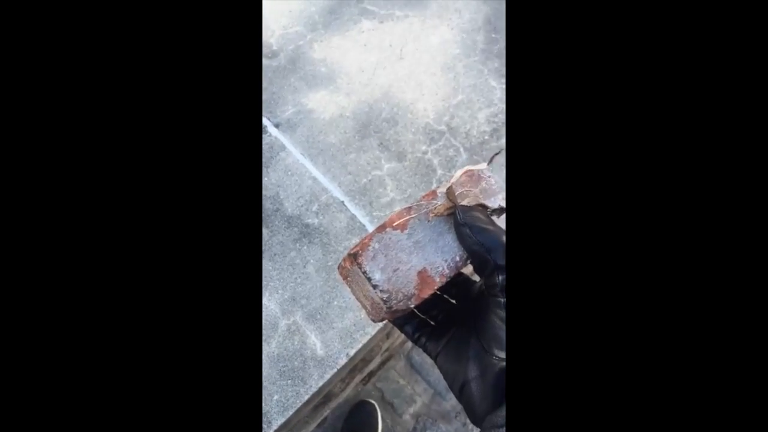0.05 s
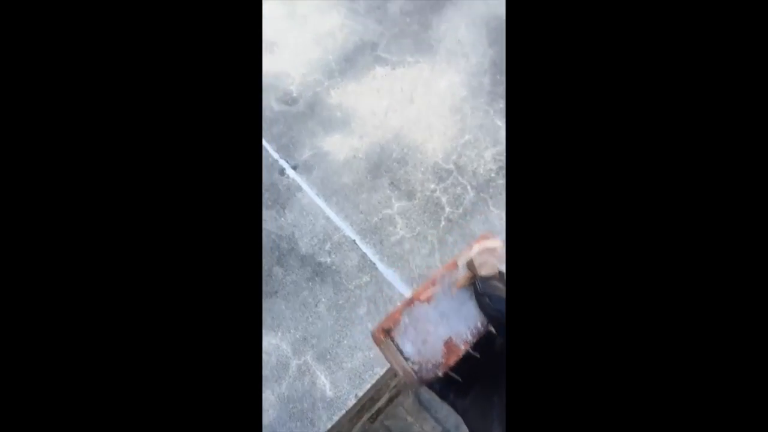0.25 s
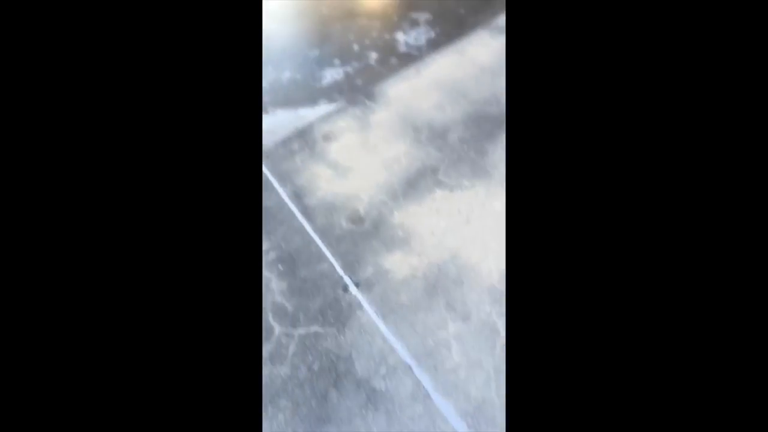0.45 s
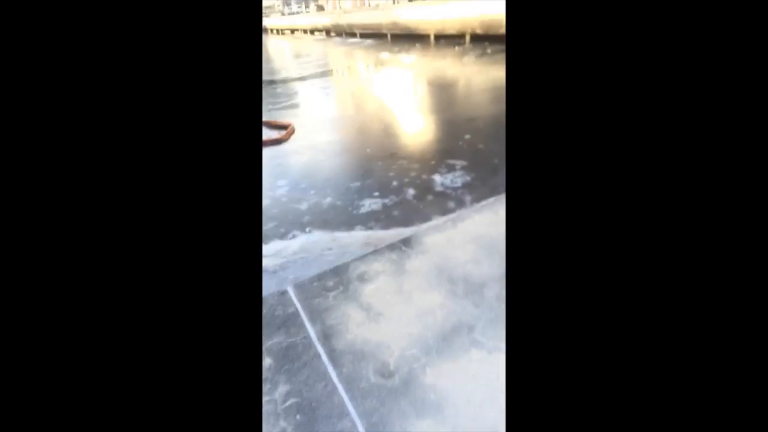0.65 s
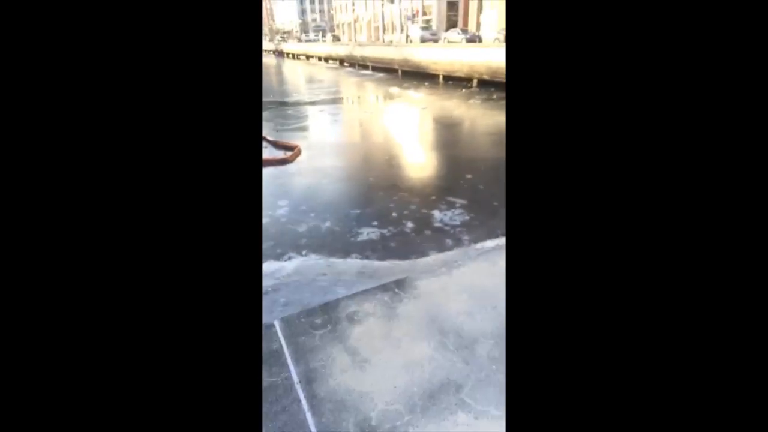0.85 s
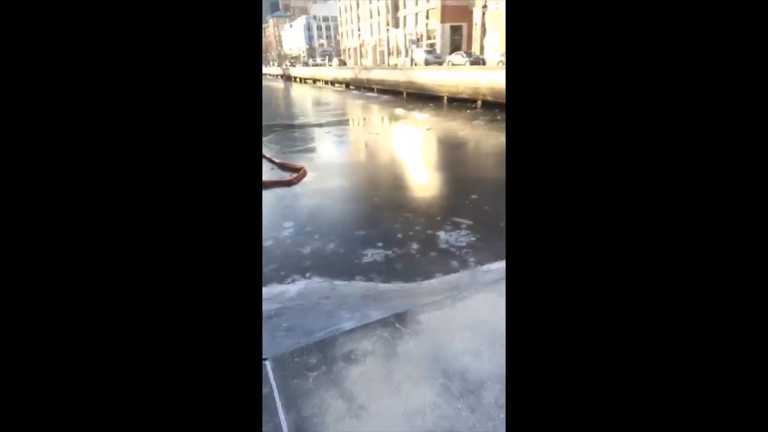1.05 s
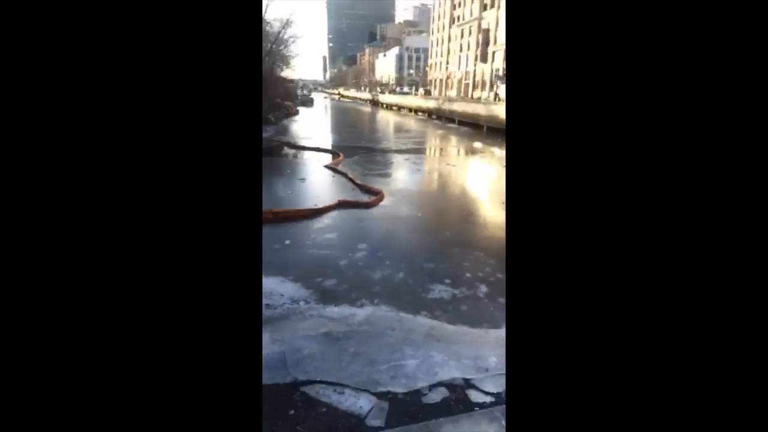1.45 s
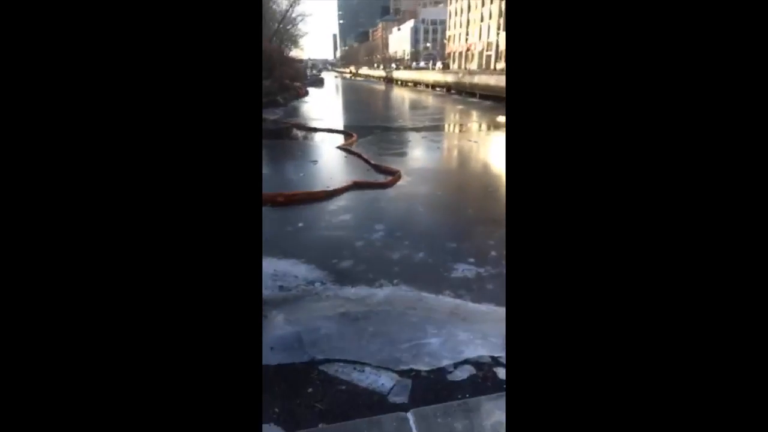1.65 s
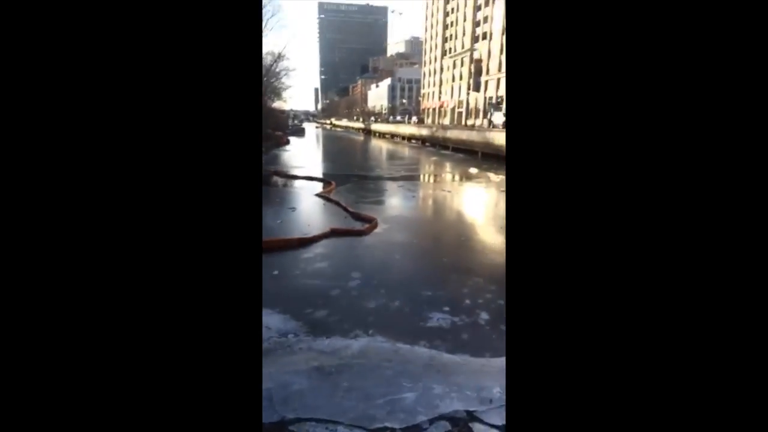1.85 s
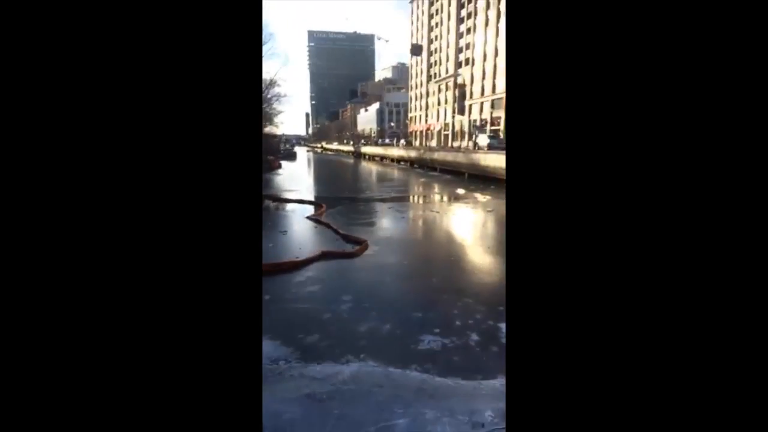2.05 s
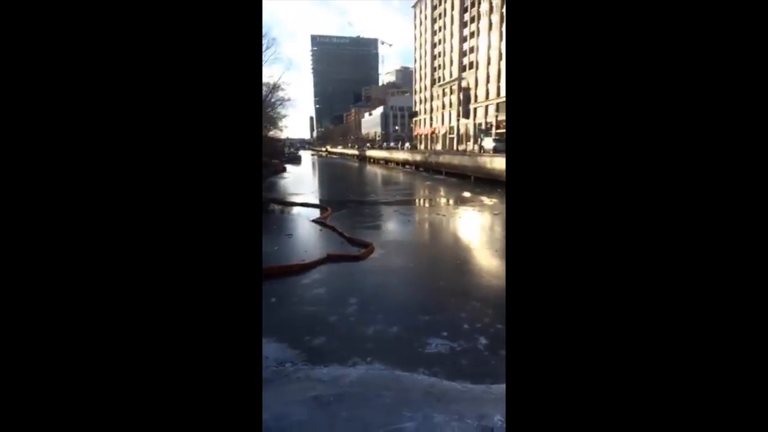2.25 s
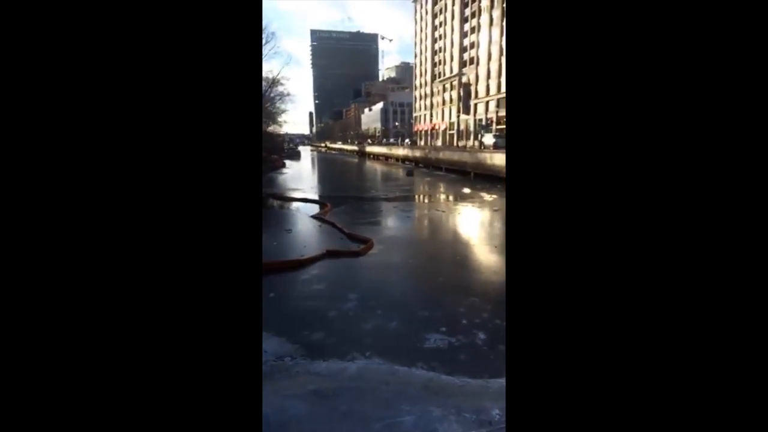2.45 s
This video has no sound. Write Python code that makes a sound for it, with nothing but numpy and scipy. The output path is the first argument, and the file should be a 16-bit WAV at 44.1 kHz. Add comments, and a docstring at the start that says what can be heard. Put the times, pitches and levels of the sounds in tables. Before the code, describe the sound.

Wind rumbles and pops on the microphone as ice briefly cracks on a frozen canal.

```python
"""Gusty wind buffets a phone microphone beside a frozen canal, over a faint town hum.
Turbulent pressure at the microphone port rumbles, flutters and pops. Midway the ice crunches,
a swarm of tiny fractures, and one larger crack excites its damped modes. The crunch trails off
in a fine crackle and a few loose chips click."""
import sys
import numpy as np
from scipy import signal
from scipy.fft import rfft, irfft
from scipy.io import wavfile
from scipy.ndimage import uniform_filter1d

SR = 44100
rng = np.random.default_rng(int(sys.argv[2]) if len(sys.argv) > 2 else 0)


def inscribe(sig):
    """Save sig as 16-bit PCM at rate SR to the path in sys.argv[1].

    A 1-D sig is mono; a 2-D sig holds one channel per row.
    Samples are clipped to [-1, 1] before scaling.
    """
    pcm = np.round(np.clip(np.atleast_2d(sig).T, -1, 1) * 32767)
    wavfile.write(sys.argv[1], SR, pcm.astype(np.int16))


N = 110250
T = np.arange(N) / SR


def undb(db):
    """Amplitude ratio of a level: tenfold per 20 dB."""
    return 10 ** (np.asarray(db) / 20)


def unit(x):
    """Normalisation to rms 1."""
    return x / np.sqrt(np.mean(x ** 2))


def curve(rows):
    """Envelope whose level is linear between points (t/s, level/dB)."""
    return undb(np.interp(T, *np.array(rows).T))


def spectral_gain(spectrum, size):
    """Magnitude response through points (f/Hz, level/dB), interpolated in log frequency."""
    hz, db = np.array(spectrum).T
    f = np.maximum(np.fft.rfftfreq(size, 1 / SR), 1)
    return undb(np.interp(np.log(f), np.log(hz), db))


def colour(x, spectrum):
    """Zero-phase filtering by a spectrum, normalised to rms 1."""
    return unit(irfft(rfft(x) * spectral_gain(spectrum, N), N))


def noise(spectrum):
    """Filtered white noise takes on the spectrum of the filter."""
    return colour(rng.standard_normal(N), spectrum)


def swells(rows, shape):
    """Incoherent addition: rounded swells (t/s, duration/s, level/dB) sum in power."""
    powers = (undb(db) ** 2 * np.exp(-np.abs(2 * (T - centre) / length) ** shape)
              for centre, length, db in rows)
    return np.sqrt(sum(powers))


def decay(start, t60):
    """Exponential damping: after a sudden onset the level falls 60 dB in t60 seconds."""
    return (T >= start) * np.exp(-np.log(1000) * np.clip((T - start) / t60, 0, 10))


def clacks(rows, spectrum, size=1024):
    """Impulses (t/s, level/dB) excite a minimum-phase response, whose energy arrives early."""
    cepstrum = irfft(np.log(spectral_gain(spectrum, size)))
    response = irfft(np.exp(rfft(2 * cepstrum[:size // 2], size)))
    pulses = np.zeros(N)
    for start, peak_db in rows:
        pulses[int(start * SR)] += undb(peak_db)
    return signal.fftconvolve(pulses, response / np.abs(response).max())[:N]


# traffic hum: spectrum (f/Hz, level/dB) and envelope (t/s, level/dB)
TOWN_SPECTRUM = [(30, -13.5), (100, 10.5), (400, 3), (800, 2), (1300, -2), (2000, -6.5), (2700, -13),
                 (3600, -21.5), (5000, -26), (9000, -30.5), (15000, -39)]
TOWN_ENVELOPE = [(0, -52), (.35, -50), (.8, -51.5), (1.0, -49.5), (1.25, -47.5), (1.6, -45.5), (1.9, -47),
                 (2.1, -48.5), (2.3, -48), (2.5, -49.5)]
def town():
    """Distant traffic adds incoherently into a smooth wash that slowly swells."""
    return noise(TOWN_SPECTRUM) * curve(TOWN_ENVELOPE)


# high hiss: spectrum (f/Hz, level/dB) and envelope (t/s, level/dB)
HISS_SPECTRUM = [(1500, -21.5), (4000, -2.5), (8000, -1.5), (12000, -4), (15500, -10)]
HISS_ENVELOPE = [(0, -87), (.2, -76.5), (.33, -70), (.5, -79), (.85, -84.5), (1.05, -73.5), (1.3, -70),
                 (1.72, -70), (1.9, -70.5), (2.12, -69.5), (2.2, -66.5), (2.27, -78), (2.5, -90)]
def hiss():
    """Slow amplitude modulation makes faint treble noise come and go."""
    return noise(HISS_SPECTRUM) * curve(HISS_ENVELOPE)


# soft rustle: spectrum (f/Hz, level/dB) and swells (centre t/s, duration/s, level/dB)
RUSTLE_SPECTRUM = [(1000, -24), (1600, -2), (2000, 3), (2300, -9), (2800, -7.5), (3500, -18), (6000, -35)]
RUSTLE_SWELLS = [(1.26, 0.18, -57), (2.1, 0.15, -54.5)]
def rustle():
    """Band-limited noise in the upper middle range swells twice."""
    return noise(RUSTLE_SPECTRUM) * swells(RUSTLE_SWELLS, shape=1.9)


# thin ticks: spectrum (f/Hz, level/dB) and onsets (t/s, level/dB)
TICK_SPECTRUM = [(1000, -25), (4000, -18), (6500, 11.5), (9000, 7), (12000, 6.5), (15500, 1)]
TICK_ONSETS = [(.797, -65), (1.190, -59), (1.199, -47), (1.210, -57), (1.506, -47), (1.523, -46),
               (1.543, -47), (1.569, -56), (1.593, -48), (1.607, -47), (1.611, -45.5), (1.624, -45),
               (1.765, -57), (2.153, -56), (2.297, -50)]
def ticks(t60_s=0.013):
    """Rapidly damped bursts of treble noise are heard as a fine, dry crackle."""
    return noise(TICK_SPECTRUM) * sum(undb(db) * decay(start, t60_s) for start, db in TICK_ONSETS)


# loose chips: spectrum (f/Hz, level/dB) and impacts (t/s, peak level/dB)
CHIP_SPECTRUM = [(300, -5), (900, 7), (1500, 3.5), (2100, 6.5), (2600, -13.5), (3300, -17), (5000, -28),
                 (9000, -22), (15000, -31)]
CHIP_IMPACTS = [(1.5802, -24), (1.6985, -23.5), (1.7128, -27), (1.8155, -35)]
def chips():
    """Impact excitation: each chip of ice clicks with a short impulse response."""
    return clacks(CHIP_IMPACTS, CHIP_SPECTRUM)


# modes of the ice (f/Hz, relative level/dB, t60/s)
ICE_RESONANCES = [(990, -15, .008), (2163, 30, 0.023), (2670, -3, 0.027), (6630, -12, .01)]
def ice_ring(start, rise_s=0.00049):
    """Modal superposition: after a fracture the ice vibrates as a sum of damped sinusoids."""
    age = T - start
    modes = sum(undb(db) * decay(start, t60) * np.sin(2 * np.pi * hz * age)
                for hz, db, t60 in ICE_RESONANCES)
    return np.clip(age / rise_s, 0, 1) * modes


# crunching ice: spectrum (f/Hz, level/dB) and bursts (centre t/s, duration/s, level/dB)
CRUNCH_SPECTRUM = [(300, 10.5), (1000, 7.5), (1600, 10), (2200, 11.5), (2750, 13.5), (3400, -2.5),
                   (4800, 2), (6500, 5.5), (8500, 3), (10500, -0.5), (12500, 4.5), (15500, -2.5)]
CRUNCH_BURSTS = [(1.394, 0.033, -49), (1.4145, 0.0089, -37.5), (1.423, 0.0079, -39.5),
                 (1.4295, 0.0023, -37), (1.435, 0.0058, -35), (1.455, 0.0074, -33), (1.461, 0.025, -46),
                 (1.467, 0.0056, -31.5), (1.52, 0.089, -52.5), (1.526, .008, -59), (1.607, 0.018, -52),
                 (1.676, 0.029, -57)]
def crunch(fractures_per_s=4600, spread_db=1.5, clump_s=0.0024, clump_db=1, ring_db=-16):
    """Shot noise: tiny fractures of uneven size come in bursts and faintly ring the ice."""
    fractures = (rng.random(N) < fractures_per_s / SR) * rng.choice([-1, 1], N)
    sizes = undb(spread_db * np.minimum(rng.exponential(size=N), 5))
    clumps = undb(clump_db * unit(uniform_filter1d(rng.standard_normal(N), int(clump_s * SR))))
    direct = colour(fractures * sizes * clumps, CRUNCH_SPECTRUM) * swells(CRUNCH_BURSTS, shape=1.7)
    ring = ice_ring(0)
    return direct + undb(ring_db) * signal.fftconvolve(direct, ring / np.linalg.norm(ring))[:N]


def crack(start_s=1.4542, peak_db=-22.5):
    """Free vibration: the main fracture rings the ice for a few milliseconds."""
    ring = ice_ring(start_s)
    return undb(peak_db) * ring / np.abs(ring).max()


# sharp edges of the hardest buffets: spectrum (f/Hz, level/dB) and onsets (t/s, level/dB)
EDGE_SPECTRUM = [(400, -4), (1200, 8.5), (2000, 1.5), (3000, -12), (4200, -25), (7000, -37), (15000, -51)]
EDGE_ONSETS = [(.3665, -47), (.477, -32.5), (.6402, -22)]
def buffet_edges():
    """An abrupt change of pressure has a broad spectrum and is heard as a clack."""
    return clacks(EDGE_ONSETS, EDGE_SPECTRUM)


# single eddies at the microphone port (t/s, level/dB, f/Hz)
EDDY_POPS = [(.211, -22.5, 326), (0.234, -27.5, 260), (.354, -21.5, 790), (.367, -28, 830),
             (0.44, -20.5, 738), (0.45, -8.5, 300), (0.479, -7, 446), (.594, -23.5, 586),
             (.6405, -11.5, 435), (1.047, -21, 670), (1.0786, -10, 320), (1.225, -20, 318),
             (1.236, -23.5, 397), (1.382, -14, 494), (1.413, -27, 266), (1.424, -18, 750), (1.65, -21, 447),
             (1.940, -23.5, 417), (1.980, -14, 378), (1.990, -18, 523), (2.0, -22.5, 550)]
def eddy_pops(rise_rad=0.89, fall_rad=3.23):
    """Each eddy pops as a pressure dip with a heavily damped oscillation."""
    pressure = np.zeros(N)
    for centre, db, hz in EDDY_POPS:
        phase = 2 * np.pi * hz * np.clip(T - centre, -.03, .03)  # keeps the exponentials finite
        pop = np.cos(phase) / (np.exp(-phase / rise_rad) + np.exp(phase / fall_rad))
        pressure -= undb(db) * pop / np.abs(pop).max()
    return pressure


def turbulence(spectrum, eddy_s=0.012):
    """Random pressure divided by its smoothed envelope has eddies of similar strength."""
    swirl = noise(spectrum)
    power = uniform_filter1d(np.abs(signal.hilbert(swirl)) ** 2, int(eddy_s * SR))
    return colour(swirl / np.sqrt(power), spectrum)


# breeze between buffets (t/s, level/dB)
BREEZE_ENVELOPE = [(0, -42.5), (.3, -46), (.55, -40), (.75, -45.5), (.93, -45.5), (1.15, -44), (1.33, -37),
                   (1.55, -40), (1.72, -58), (1.82, -49.5), (2.05, -39), (2.15, -55), (2.3, -62),
                   (2.5, -43.5)]
# buffets (centre t/s, duration/s, rumble level/dB, flutter level/dB)
WIND_BUFFETS = [(0.046, 0.032, -33, -43.5), (0.127, 0.027, -37.5, -50.5), (.212, 0.013, -27, -42),
                (0.233, 0.012, -23.5, -40), (0.281, 0.043, -34, -49), (0.341, 0.013, -18.5, -29),
                (.371, 0.032, -24, -24), (0.403, 0.037, -26.5, -37), (0.446, 0.029, -20.5, -26.5),
                (0.48, 0.018, -18.5, -19), (.497, 0.025, -23, -28), (0.592, 0.013, -16.5, -29),
                (0.614, 0.015, -23, -31), (.646, 0.021, -17, -21.5), (0.669, 0.035, -31, -35),
                (0.709, 0.015, -19.5, -31), (0.807, 0.025, -34.5, -71), (0.895, 0.0096, -32, -60),
                (0.958, 0.015, -33.5, -51), (1.014, 0.029, -29, -43), (1.05, 0.016, -28.5, -23),
                (1.072, 0.035, -29.5, -36.5), (1.11, 0.024, -31.5, -38), (1.132, 0.025, -26.5, -40),
                (1.228, .02, -23.5, -45), (1.264, 0.018, -31.5, -46), (1.365, 0.0057, -27, -33),
                (1.387, 0.028, -30.5, -35), (1.407, 0.027, -23.5, -27.5), (1.465, 0.0137, -28, -38),
                (1.586, 0.0089, -25, -41), (1.621, 0.031, -28.5, -43.5), (1.668, 0.033, -27.5, -42),
                (1.725, 0.038, -27, -44.5), (1.774, 0.015, -29.5, -41), (1.843, 0.029, -31, -47.5),
                (1.947, 0.011, -27, -45), (1.993, 0.02, -24, -27.5), (2.019, 0.014, -27.5, -65),
                (2.061, .015, -30, -49), (2.222, 0.028, -28.5, -76), (2.261, 0.069, -34, -73),
                (2.362, 0.021, -38.5, -52), (2.429, 0.038, -32.5, -51)]
# spectra of the low and the higher turbulence (f/Hz, level/dB)
RUMBLE_SPECTRUM = [(20, -33), (60, -21.5), (100, -5.5), (150, -1), (230, -0.5), (330, -4.5), (450, -9.5),
                   (650, -23), (1000, -52.5), (2000, -79)]
FLUTTER_SPECTRUM = [(100, -9.5), (300, -4), (480, -3.5), (650, -7), (900, -11), (1300, -16.5), (2000, -24),
                    (3200, -48), (8000, -66.5)]
def wind(port_hz=95, buffet_shape=2.6):
    """Turbulent pressure rumbles and, in hard buffets, flutters; the port acts as a high-pass filter."""
    buffets = np.array(WIND_BUFFETS)
    rumble_swells = swells(buffets[:, [0, 1, 2]], buffet_shape)
    flutter_swells = swells(buffets[:, [0, 1, 3]], buffet_shape)
    rumble = np.hypot(curve(BREEZE_ENVELOPE), rumble_swells) * turbulence(RUMBLE_SPECTRUM)
    flutter = flutter_swells * turbulence(FLUTTER_SPECTRUM)
    port = signal.butter(2, port_hz, "high", fs=SR, output="sos")
    return signal.sosfilt(port, rumble + flutter + buffet_edges() + eddy_pops())


def scene():
    """Linear superposition of wind, ice and background, in mono."""
    return (wind() + crunch() + crack() + chips() + ticks() + town() + hiss() + rustle())[None]


def record(dry):
    """Band limiting: the phone's steep low-pass filter removes the highest treble."""
    cutoff_hz = 15400
    return signal.sosfilt(signal.ellip(10, .2, 80, cutoff_hz, fs=SR, output="sos"), dry)


dry = scene()
out = record(dry)
inscribe(out)
```